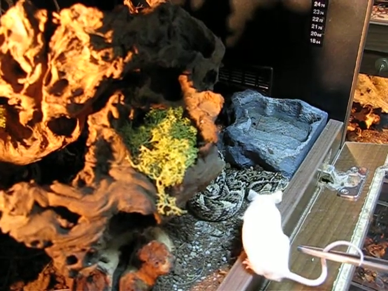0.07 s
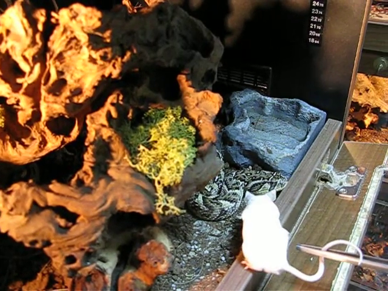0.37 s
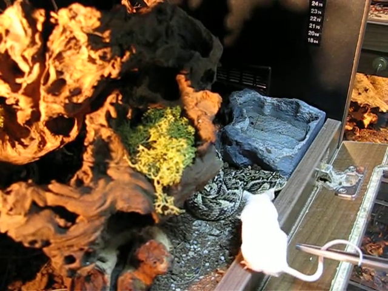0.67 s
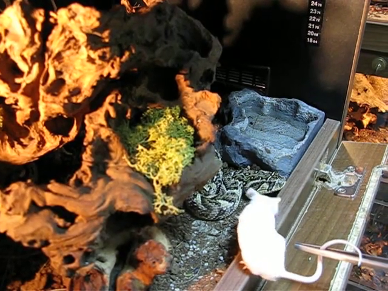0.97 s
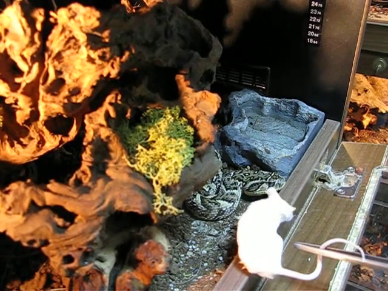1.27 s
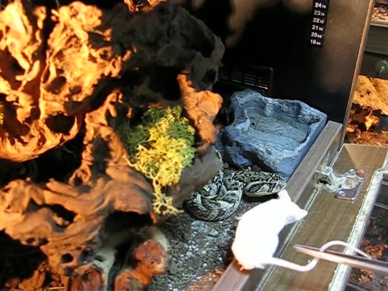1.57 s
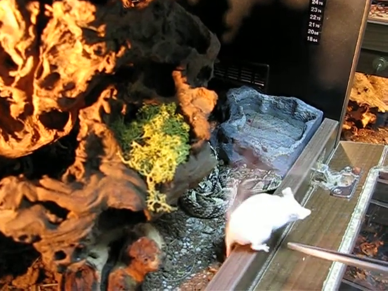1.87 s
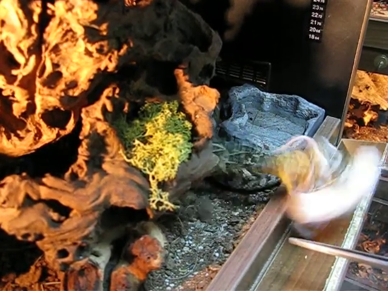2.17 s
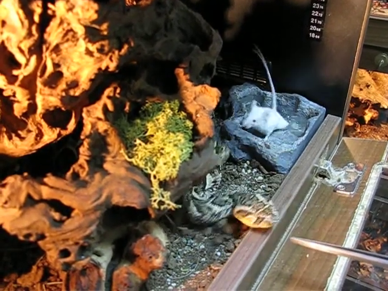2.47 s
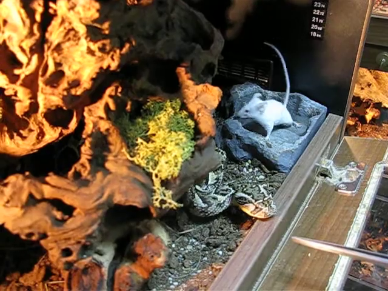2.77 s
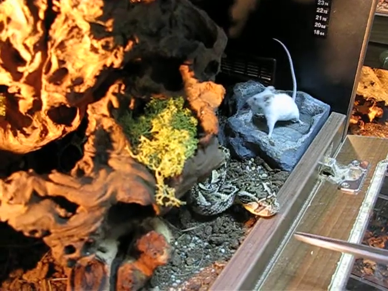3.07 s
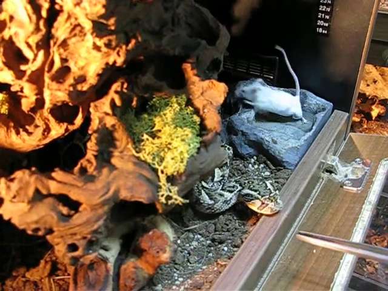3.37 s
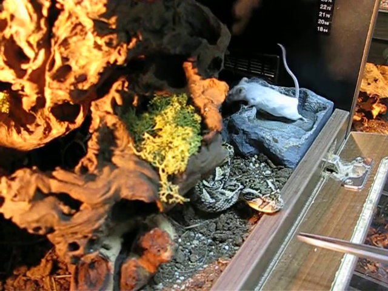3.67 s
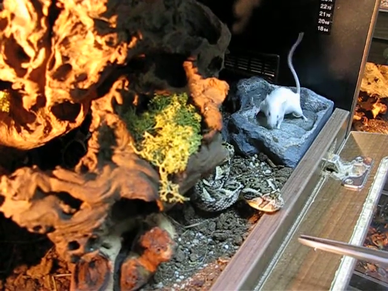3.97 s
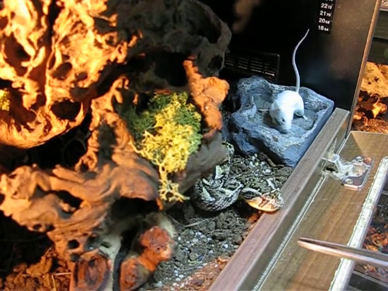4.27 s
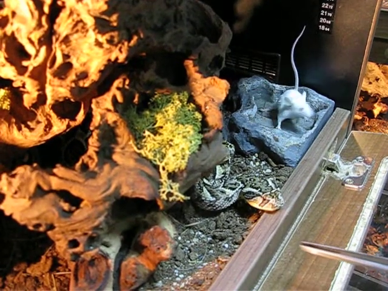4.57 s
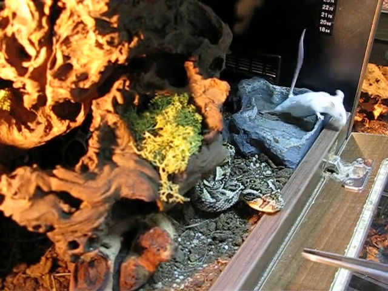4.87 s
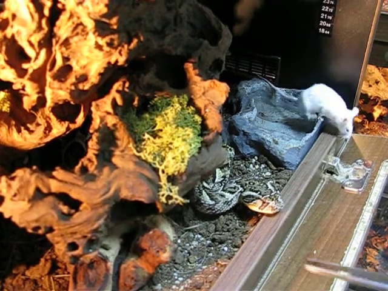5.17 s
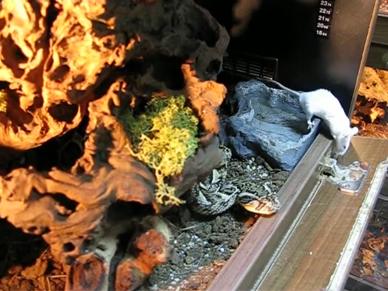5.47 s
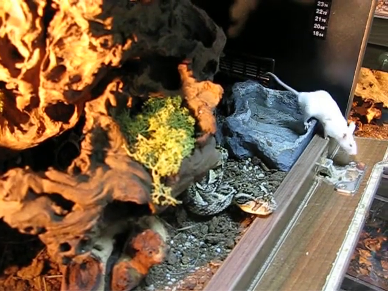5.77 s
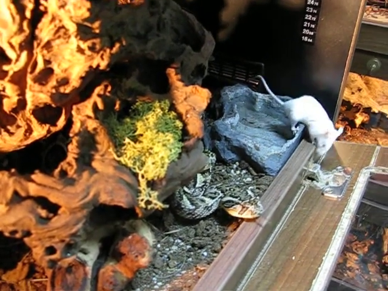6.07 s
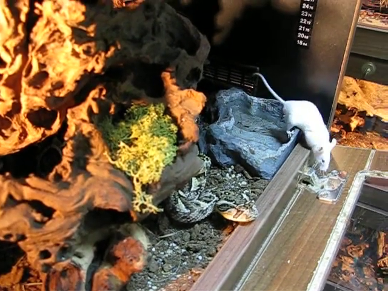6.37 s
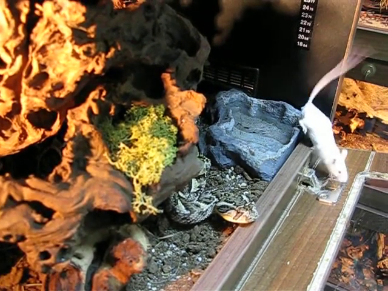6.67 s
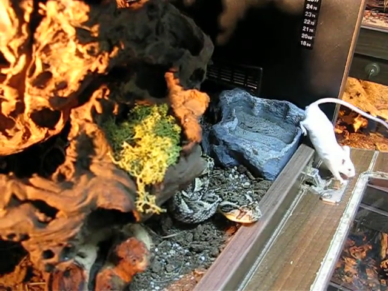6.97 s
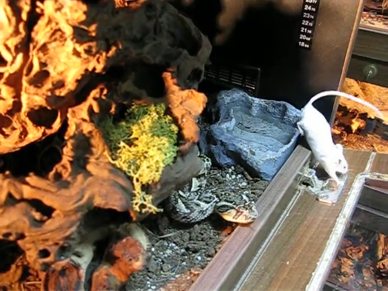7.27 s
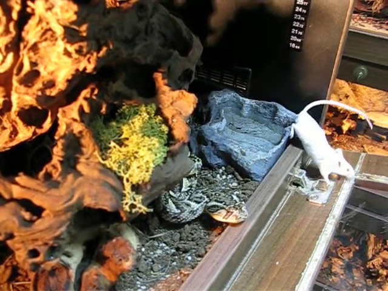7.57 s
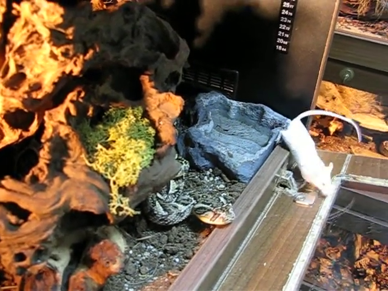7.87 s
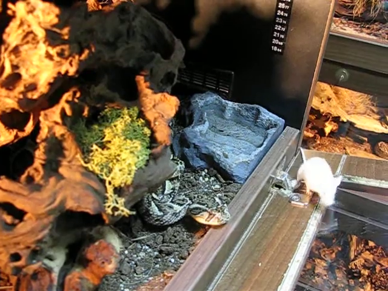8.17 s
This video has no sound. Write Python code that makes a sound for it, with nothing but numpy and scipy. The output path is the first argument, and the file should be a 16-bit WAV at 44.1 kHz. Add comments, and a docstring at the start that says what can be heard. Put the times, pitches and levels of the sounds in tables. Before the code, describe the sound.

Heard from close by, a small terrarium is nearly silent apart from soft room hiss and tiny paw taps. A half-second scuffle breaks out as a snake lunges at a mouse, with gritty scratching, hollow thuds, a short high squeak and hard clacks, the last one loudest. The quiet returns with a few claw ticks and a slight rustle, until the mouse knocks once against the frame while climbing out.

```python
"""A mouse struggles as a snake strikes at it, in a small glass terrarium in a quiet room.
Claws scrabble over grit and frame, body blows boom in the panel, and the mouse gives one shrill squeak,
leaps and lands with a sharp clack in a dish. Before and after: small claw ticks, one knock on the frame.
One microphone, close, just outside the open front, hears the glass walls and a short room tail."""
import sys
import numpy as np
from scipy import signal
from scipy.fft import rfft, irfft
from scipy.io import wavfile

SR = 44100
rng = np.random.default_rng(int(sys.argv[2]) if len(sys.argv) > 2 else 0)


def master_out(mix):
    """Clip the mix to full scale and print it as 16-bit PCM to the path in sys.argv[1]."""
    frames = np.transpose(np.atleast_2d(mix))
    ceiling = np.clip(frames, -1, 1)
    pcm = np.round(ceiling * 32767).astype(np.int16)
    wavfile.write(sys.argv[1], SR, pcm)


N = 371322
TIME = np.arange(N) / SR
CUTOFF_HZ = 15800


def from_db(db):
    """Decibels to gain."""
    return 10 ** (np.asarray(db) / 20)


def unit_rms(x):
    """Scale to rms 1."""
    return x / np.sqrt(np.mean(x ** 2) + 1e-20)


def db_at(spectrum, hz):
    """A spectrum's level at these frequencies."""
    known_hz, db = np.transpose(spectrum)
    return np.interp(np.log(hz), np.log(known_hz), db)


def colour(x, spectrum, size=4096):
    """Causal (minimum-phase) filter that keeps the power of white noise."""
    hz = np.maximum(np.fft.rfftfreq(size, 1 / SR), 1)
    gain = from_db(db_at(spectrum, hz)) * np.minimum(hz / spectrum[0][0], 1)
    cepstrum = irfft(np.log(gain))
    response = irfft(np.exp(rfft(2 * cepstrum[:size // 2], size)))
    return signal.fftconvolve(x, response / np.linalg.norm(response))[:N]


def drift(rate_hz):
    """Smooth random wander, rms 1."""
    lowpass = signal.butter(2, rate_hz, fs=SR, output="sos")
    return unit_rms(signal.sosfilt(lowpass, rng.standard_normal(N)))


def grains(per_s, spread_db):
    """Random tiny contacts of uneven size, rms 1."""
    sizes = from_db(spread_db * np.minimum(rng.exponential(1, N), 3)) * rng.choice([-1, 1], N)
    return unit_rms(sizes * (rng.random(N) < per_s / SR))


def add(track, s, sound):
    """Mix a short sound in at time s."""
    at = round(s * SR)
    track[at:at + len(sound)] += sound[:N - at]


def burst(rise_s, decay_s, band_hz=None, size=6000):
    """A crunching contact: noise of even spectrum that swells to rms 1 and dies away."""
    t = TIME[:size]
    envelope = np.minimum(t / rise_s, 1) * np.exp(-np.maximum(t - rise_s, 0) / decay_s)
    phases = np.angle(rfft(envelope * rng.standard_normal(size)))
    noise = irfft(np.exp(1j * phases)) * np.sqrt(envelope)
    if band_hz is not None:
        bandpass = signal.butter(2, np.clip(band_hz, 100, .45 * SR), "band", fs=SR, output="sos")
        noise = signal.sosfilt(bandpass, noise + 1e-18)
    return noise * np.linalg.norm(envelope) / np.linalg.norm(noise)


def touches(rows, width_hz, decay_s, rise_s=0.00074):
    """Small contacts (t/s, level/dB, f/Hz), each ringing in its own band."""
    out = np.zeros(N)
    for s, db, hz in rows:
        add(out, s, from_db(db) * burst(rise_s, decay_s, [hz - width_hz / 2, hz + width_hz / 2]))
    return out


def ring_modes(blows, modes, rise_s=.0005, size=16000):
    """Every blow sets the modes ringing; they build up while the contact lasts."""
    t, out = TIME[:size], np.zeros(N)
    ring = sum(from_db(db - 60 * t / t60) * np.sin(2 * np.pi * hz * t) for hz, db, t60 in modes)
    for s, db in blows:
        add(out, s, from_db(db) * ring * np.minimum(t / rise_s, 1))
    return out


# Spectrum of the quiet room at the microphone: f/Hz, relative level/dB
AIR_SPECTRUM = [(15, -32), (25, -4), (152, -1), (184, -2), (284, -1.5), (425, -3), (620, -3), (857, -4),
                (1180, -5.5), (1430, -7.5), (1640, -8.5), (2590, -11), (8490, -17), (11400, -18),
                (15800, -22)]
# Electrical hum and whine: f/Hz, rms level/dB
HUM_TONES = [(150.7, -77.5), (11493, -73.5), (12796, -83), (15143, -86)]
def room_tone(air_db=-52, waver_rad=.3):
    """Steady air and hiss, with electrical tones that waver slightly."""
    hum = sum(from_db(db) * np.sin(2 * np.pi * hz * TIME + waver_rad * drift(rate_hz=32))
              for hz, db in HUM_TONES)
    return from_db(air_db) * colour(rng.standard_normal(N), AIR_SPECTRUM) + np.sqrt(2) * hum


# The mouse moving about the terrarium: middle t/s, spread/s, level/dB
MOVEMENTS = [(2.3, 0.23, -48.5), (5.15, .3, -68), (6.45, 0.46, -60.5)]
# Spectrum of the floor grit, rustled or scrabbled: f/Hz, relative level/dB
GRIT_SPECTRUM = [(600, -40), (2000, 2), (3200, 4), (5500, 3.5), (8000, 0.5), (11000, 1), (15500, 1.5)]
def fur_rustle(rest_db=-63.5):
    """Fur and paws make a faint grainy rustle that swells with each movement."""
    swells = sum(from_db(db) * np.exp(-((TIME - s) / spread) ** 2) for s, spread, db in MOVEMENTS)
    return (from_db(rest_db) + swells) * colour(grains(per_s=3000, spread_db=4), GRIT_SPECTRUM)


# Thin claw scratches, close by: t/s, level/dB
CLAW_SCRATCHES = [(.8456, -53), (1.475, -51.5), (1.755, -52), (1.8015, -46.5), (1.9352, -51), (2.5046, -38),
                  (2.5263, -37.5), (3.3395, -48.5)]
# Light taps of paws and loose grains: t/s, level/dB, centre f/Hz
PAW_TAPS = [(1.1529, -49.5, 5600), (1.4652, -48.5, 4700), (2.386, -29, 2660), (2.5982, -47, 3760),
            (3.345, -47, 2400), (5.1085, -43.5, 1390), (5.334, -50.5, 3250)]
def claw_ticks(scratch_hz=12000, ping_s=3.341, ping_db=-40, ping_hz=2730):
    """Claws scratch, paws tap, and one tap makes the dish ring."""
    scratches = touches([(s, db, scratch_hz) for s, db in CLAW_SCRATCHES], width_hz=5200, decay_s=0.008)
    ping = touches([(ping_s, ping_db, ping_hz)], width_hz=105, decay_s=0.009)
    taps = touches(PAW_TAPS, width_hz=1430, decay_s=0.007)
    return scratches + taps + ping


# Bouts of scrabbling on floor and frame: t/s, length/s, grit level/dB, wood level/dB
SCRABBLE_BOUTS = [(2.0167, 0.0094, -33.5, -41), (2.028, 0.026, -29.5, -28), (2.066, 0.056, -29.5, -30),
                  (2.129, 0.033, -30, -31), (2.268, .045, -37, -41.5), (2.324, 0.034, -40, -41.5),
                  (2.371, .02, -39, -41)]
# Spectrum of the wooden frame under the feet: f/Hz, relative level/dB
WOOD_SPECTRUM = [(120, -14), (380, -6.5), (560, 2.5), (850, -2), (1150, -6), (1620, -5), (2100, -17),
                 (6000, -18)]
def scrabble(slip_db=-7.5, slip_s=.012, push_s=.002, sag_db_per_s=122, let_go_s=0.0057):
    """Claws drag through grit and drum on the frame: a growing slip, a push, then fading force."""
    grit_force, wood_force = np.zeros(N), np.zeros(N)
    for s, length, grit_db, wood_db in SCRABBLE_BOUTS:
        t = TIME - s
        since = np.maximum(t, 0)
        slip = from_db(slip_db) * np.exp(-np.abs(t) / slip_s) * (t < 0)
        let_go = np.exp(-np.maximum(t - length, 0) / let_go_s)
        push = np.minimum(since / push_s, 1) * from_db(-sag_db_per_s * since) * let_go
        grit_force += from_db(grit_db) * (slip + push)
        wood_force += from_db(wood_db) * (slip ** 2 + push)
    grit = colour(grit_force * grains(per_s=7000, spread_db=4), GRIT_SPECTRUM)
    wood = colour(wood_force * grains(per_s=2500, spread_db=-1), WOOD_SPECTRUM)
    return grit + wood


# Body blows that shake the enclosure's panel: t/s, relative level/dB
BODY_BLOWS = [(2.024, -33), (2.082, -44), (2.17, -40), (2.261, -41), (2.336, -41), (2.392, -30.5),
              (2.4862, -40.5)]
# Resonances of the panel and of the floor: f/Hz, relative level/dB, t60/s
PANEL_MODES = [(227.8, 0.5, 0.28), (175, -7.5, 0.19), (300, -12.5, 0.25), (626, -5, 0.19), (794, -4, 0.2),
               (1190, 0, 0.15)]
FLOOR_MODES = [(82.6, -9, 0.11), (137, -5, 0.089)]
def enclosure_boom(thud_s=2.082, thud_db=-22.5, bounce_s=.0325, bounce_loss_db=3):
    """The animals' weight rings the panel; the strike thuds on the floor and bounces twice."""
    thuds = [(thud_s + k * bounce_s, thud_db - k * bounce_loss_db) for k in range(3)]
    panel = ring_modes(BODY_BLOWS, PANEL_MODES, rise_s=0.0052)
    floor = ring_modes(thuds, FLOOR_MODES, rise_s=0.0024)
    # Small panels give no sub-bass, soft bodies no click.
    bandpass = signal.butter(1, [100, 420], "band", fs=SR, output="sos")
    return signal.sosfilt(bandpass, panel + floor)


# Hard hits on dish and frame: t/s, level/dB, rise/s
CLACK_HITS = [(2.0467, -17, 0.00045), (2.1586, -20, 0.00088), (2.3938, -7.5, .0019), (2.3997, -25, .0011)]
# Spectrum of those hits: f/Hz, relative level/dB
CLACK_SPECTRUM = [(250, -15), (450, -16.5), (850, -11), (1300, -7.5), (2000, -17), (3100, -11), (4500, -2),
                  (5400, -6.5), (7500, 3.5), (9800, -0.5), (11500, -5), (15500, -9.5)]
def clacks():
    """Hard, bright impacts, each a crunch of a few milliseconds."""
    out = np.zeros(N)
    for s, db, rise_s in CLACK_HITS:
        add(out, s, from_db(db) * burst(rise_s, decay_s=0.0015))
    return colour(out, CLACK_SPECTRUM)


# Course of the squeak: t/s, pitch f/Hz, relative level/dB of the lines at odd halves of the pitch
SQUEAK_COURSE = [(2.159, 4250, -13), (2.163, 4146, -10), (2.1645, 3360, -7), (2.177, 3350, -3),
                 (2.182, 2758, -16), (2.189, 2780, -18), (2.199, 3020, -12), (2.213, 3180, -21),
                 (2.219, 3720, -20), (2.235, 3670, 6), (2.25, 3640, 14)]
# Resonances of the mouse's throat: f/Hz, relative level/dB
THROAT_SPECTRUM = [(1700, -27), (2800, -25), (3300, -9), (3700, -10.5), (4200, -12), (4900, -12),
                   (5500, -6), (6400, -9.5), (7400, 7), (8400, 2.5), (9300, -9.5), (10150, 0.5),
                   (12300, -23), (15200, -11)]
def squeak(base_db=-27, attack_s=0.0017, hold_s=0.078, release_s=0.0075, jitter=.017, rasp_db=-13):
    """A shrill cry that yelps, holds and dies; its pitch jumps, and strain doubles its period."""
    times, course_hz, course_db = np.transpose(SQUEAK_COURSE)
    sounding = (TIME > times[0]) & (TIME < times[-1])
    t = TIME[sounding] - times[0]
    pitch = np.interp(TIME, times, course_hz) * (1 + jitter * drift(rate_hz=632))
    phase = 2 * np.pi * np.cumsum(pitch) / SR
    multiples = np.arange(1, 12)[:, None] / 2
    hz = multiples * pitch[sounding]
    doubling_db = np.interp(TIME[sounding], times, course_db) * (multiples % 1 > 0)
    gains = from_db(db_at(THROAT_SPECTRUM, hz) + doubling_db) * (hz < CUTOFF_HZ)
    partials = gains * np.sin(multiples * phase[sounding])
    voice = np.sqrt(2) * partials.sum(axis=0) / np.linalg.norm(gains, axis=0)
    rasp = from_db(rasp_db) * colour(rng.standard_normal(N), THROAT_SPECTRUM)[sounding]
    envelope = np.minimum(t / attack_s, 1) * np.exp(-np.maximum(t - hold_s, 0) / release_s)
    yelp_db = 9.5 * np.exp(-t / 0.018)  # extra force at the start, soon spent
    crack_db = 7.5 * (t < 0.004)  # the first high note is louder still, until the voice breaks
    shimmer_db = 2.5 * drift(rate_hz=250)[sounding]
    out = np.zeros(N)
    out[sounding] = envelope * from_db(base_db + yelp_db + crack_db + shimmer_db) * (voice + rasp)
    return out


# A knock on the frame and its rebound: t/s, level/dB
FRAME_KNOCKS = [(8.1324, -32.5), (8.139, -42)]
# Spectrum of the contact: f/Hz, relative level/dB
KNOCK_SPECTRUM = [(200, -2), (480, -0.5), (1000, -3), (1900, -5), (3100, 4.5), (4600, 2), (6800, -7),
                  (9000, -16), (15000, -22)]
# Resonances of the frame: f/Hz, relative level/dB, t60/s
FRAME_MODES = [(330, -10, .08), (470, -3, 0.074), (608, 1, 0.12), (1050, -6, 0.065), (1455, 6, 0.086),
               (2477, 0, .11), (2830, 2, 0.06), (3020, 0, .06), (3520, -3, .07)]
def frame_knock(ring_db=-15, snap_db=13):
    """The frame snaps and rattles as the mouse climbs out over it."""
    contacts = np.zeros(N)
    for s, db in FRAME_KNOCKS:
        add(contacts, s, from_db(db) * burst(rise_s=0.00029, decay_s=0.003))
        add(contacts, s, from_db([db + snap_db]))  # one-sample snap
    return colour(contacts, KNOCK_SPECTRUM) + from_db(ring_db) * ring_modes(FRAME_KNOCKS, FRAME_MODES)


def reflections(x, glass_db, room_db, treble_t60, bass_t60=0.24, split_hz=3800, size=16000):
    """Quick echoes between the glass walls, and a room tail whose bass and treble die at their own rates."""
    t = TIME[:size]
    early, late = rng.standard_normal((2, size))
    glass = from_db(glass_db) * unit_rms(early * np.exp(-t / 0.0039))
    bass = signal.sosfiltfilt(signal.butter(2, split_hz, fs=SR, output="sos"), late)
    tail = bass * from_db(-60 * t / bass_t60) + (late - bass) * from_db(-60 * t / treble_t60)
    room = from_db(room_db) * unit_rms(tail)
    echoes = signal.fftconvolve(x, (glass + room) / np.sqrt(size))[:N]
    out = x.copy()
    add(out, 0.003, echoes)  # they reach the microphone 3 ms after the direct sound
    return out


def scene():
    """The terrarium in mono, from just outside its open front."""
    feet = reflections(scrabble() + claw_ticks(), glass_db=-8, room_db=-9.5, treble_t60=0.34)
    impacts = reflections(clacks(), glass_db=-12.5, room_db=-7.5, treble_t60=0.19)
    cry = reflections(squeak(), glass_db=-12, room_db=-10.5, treble_t60=0.29)
    knock = reflections(frame_knock(), glass_db=-1, room_db=-0.5, treble_t60=0.13)
    return (feet + impacts + cry + knock + enclosure_boom() + fur_rustle() + room_tone())[None]


def record(dry, ceiling=0.8):
    """After the microphone, the highest peaks are rounded and the top treble is cut steeply."""
    rounded = ceiling * np.tanh(dry / ceiling)
    return signal.sosfilt(signal.ellip(12, .1, 80, CUTOFF_HZ, fs=SR, output="sos"), rounded)


dry = scene()
out = record(dry)
master_out(out)
```